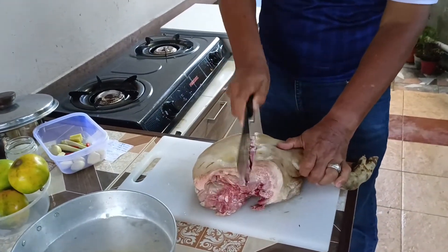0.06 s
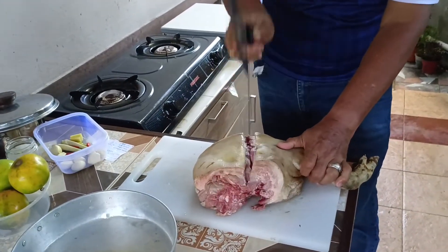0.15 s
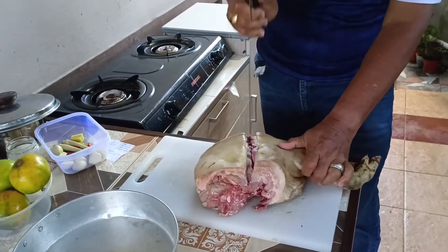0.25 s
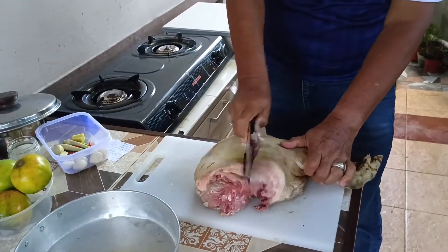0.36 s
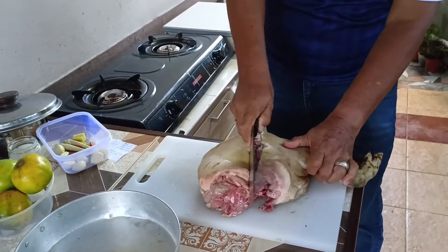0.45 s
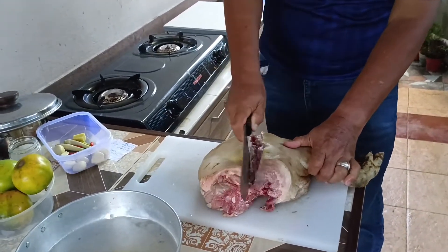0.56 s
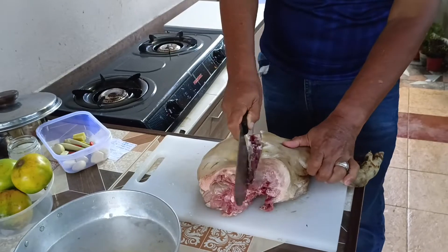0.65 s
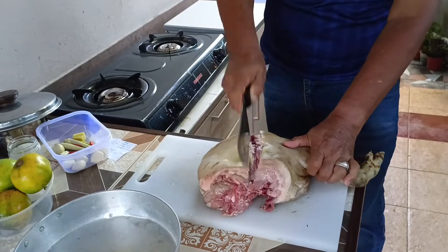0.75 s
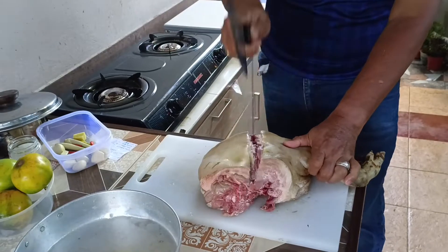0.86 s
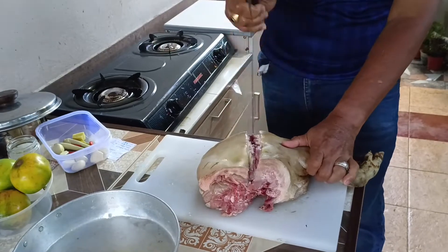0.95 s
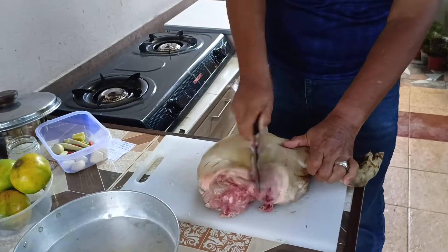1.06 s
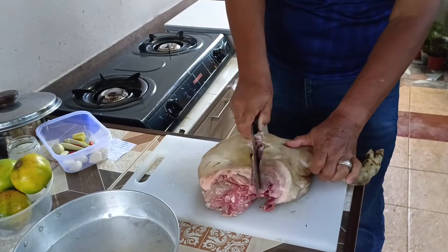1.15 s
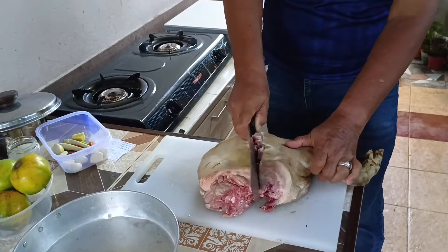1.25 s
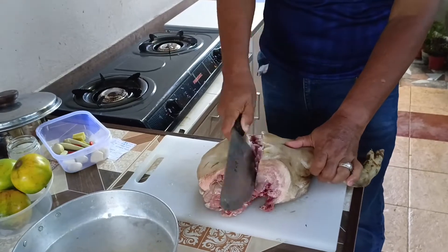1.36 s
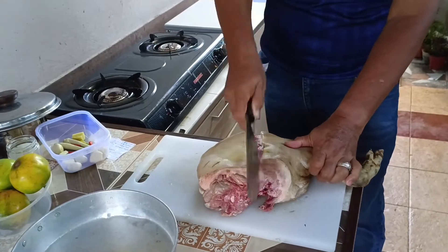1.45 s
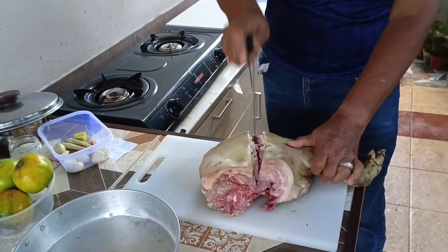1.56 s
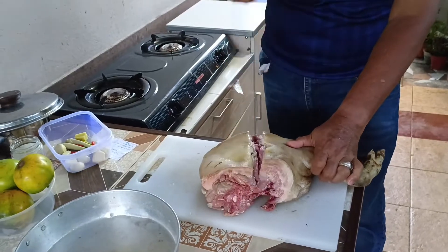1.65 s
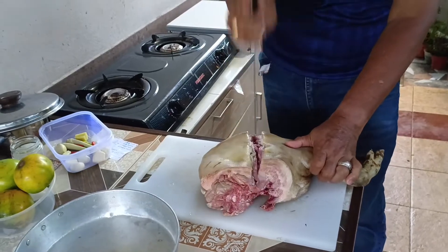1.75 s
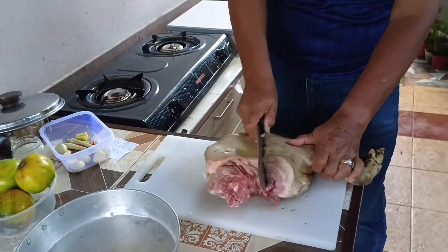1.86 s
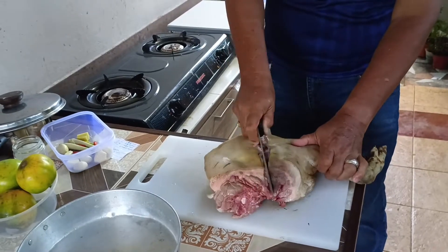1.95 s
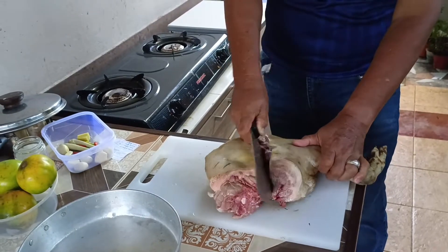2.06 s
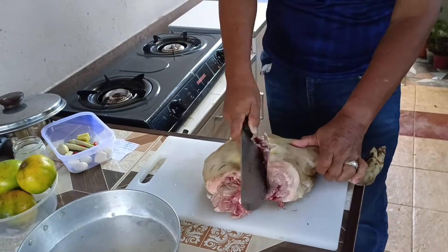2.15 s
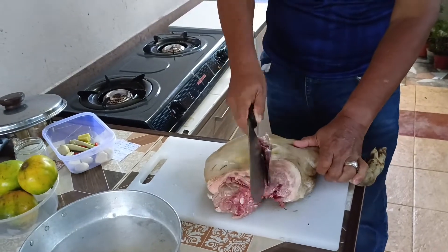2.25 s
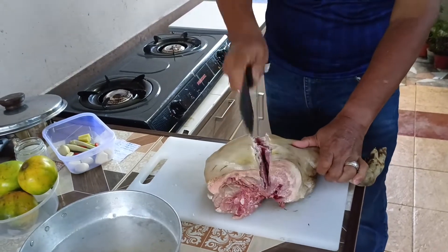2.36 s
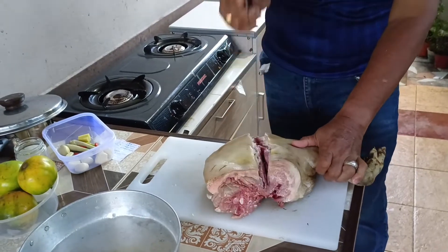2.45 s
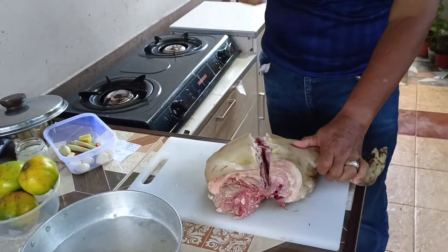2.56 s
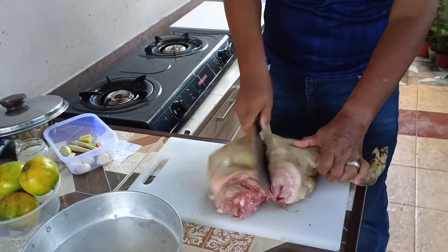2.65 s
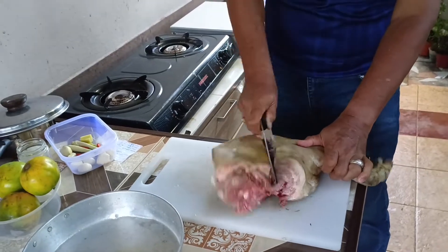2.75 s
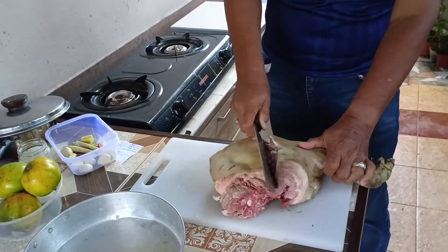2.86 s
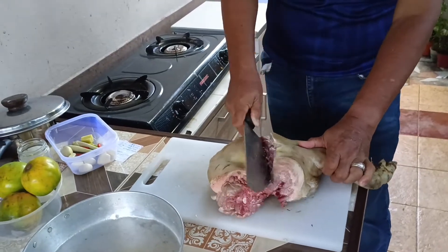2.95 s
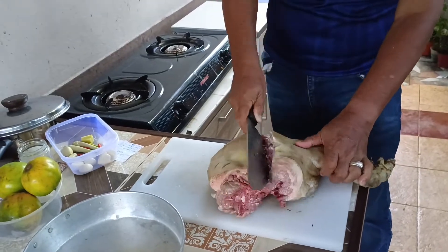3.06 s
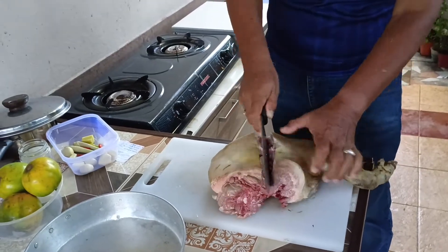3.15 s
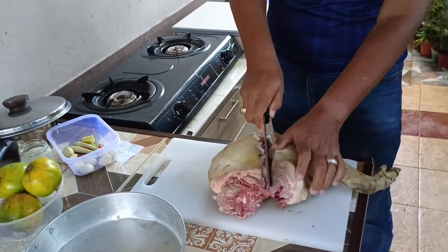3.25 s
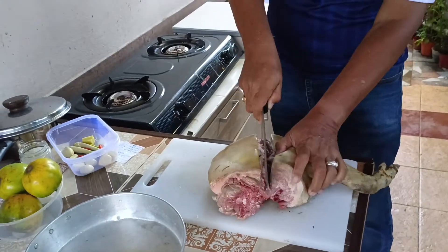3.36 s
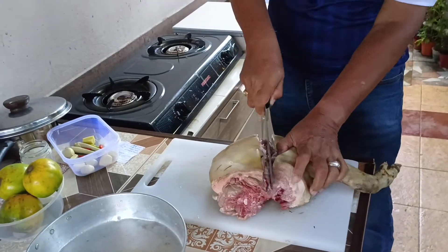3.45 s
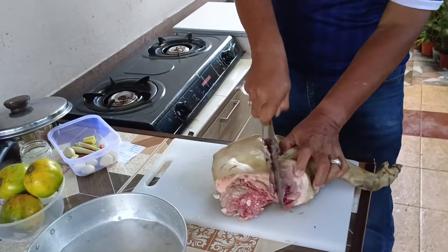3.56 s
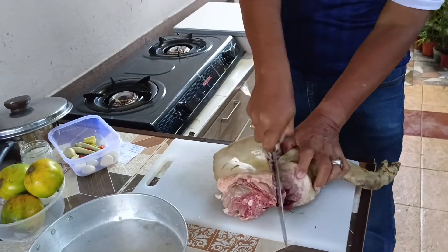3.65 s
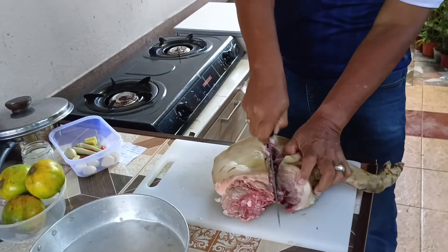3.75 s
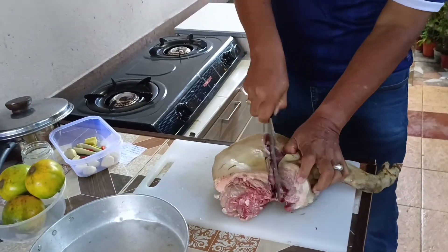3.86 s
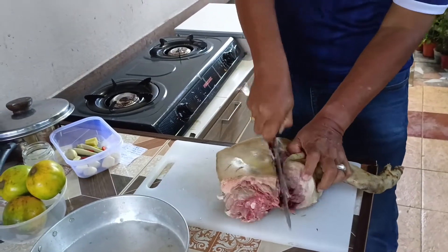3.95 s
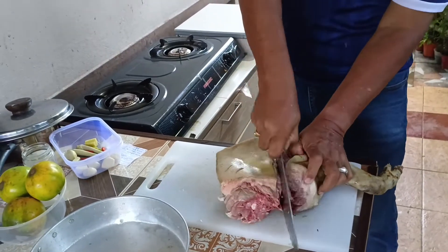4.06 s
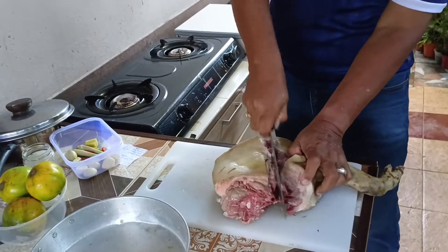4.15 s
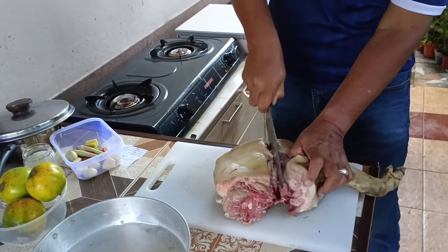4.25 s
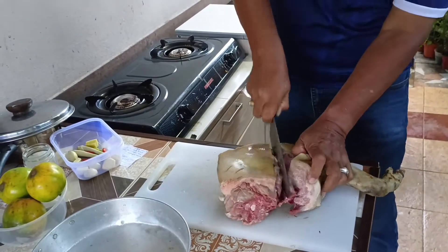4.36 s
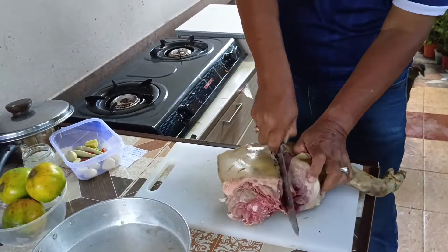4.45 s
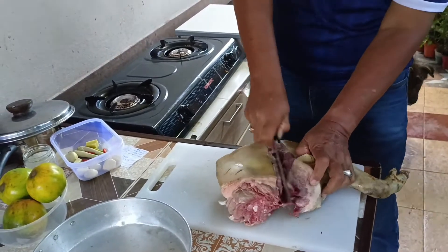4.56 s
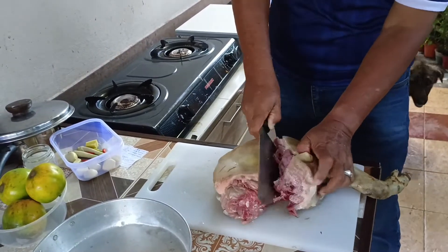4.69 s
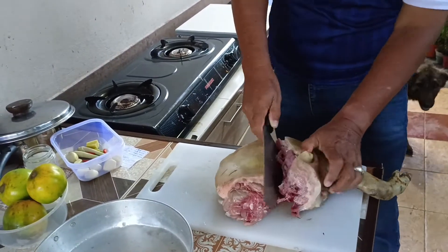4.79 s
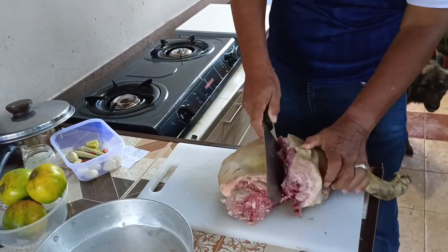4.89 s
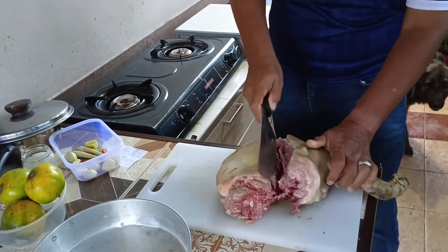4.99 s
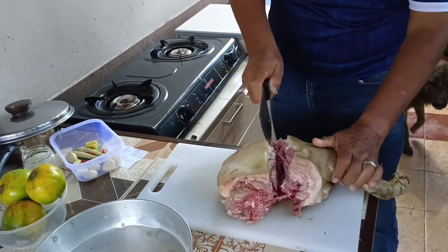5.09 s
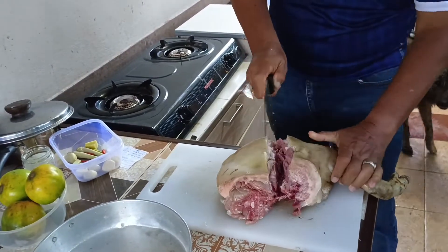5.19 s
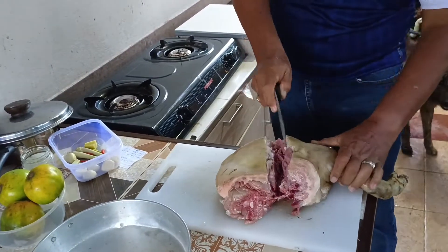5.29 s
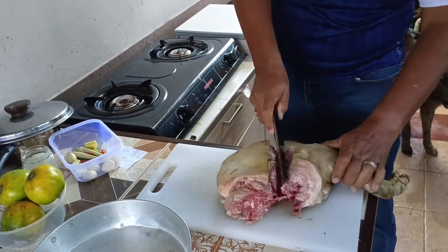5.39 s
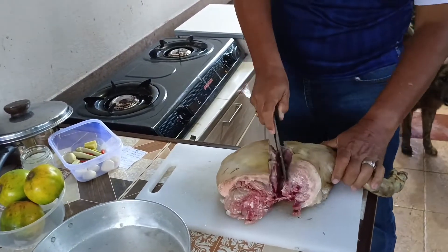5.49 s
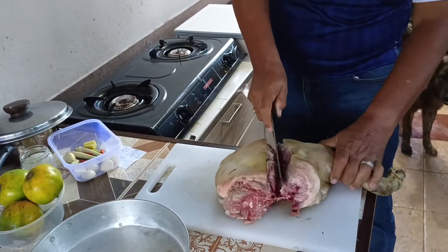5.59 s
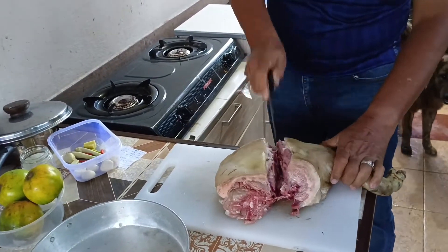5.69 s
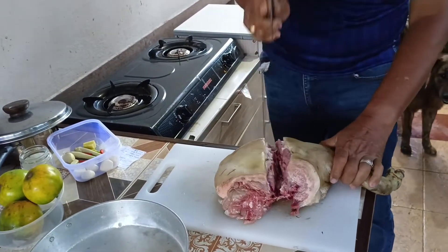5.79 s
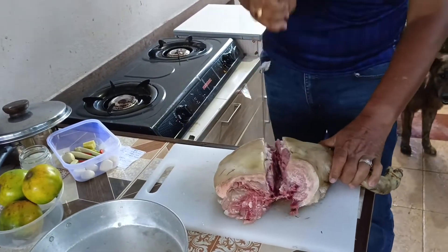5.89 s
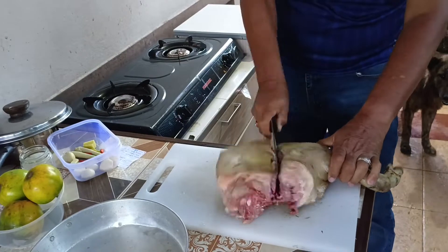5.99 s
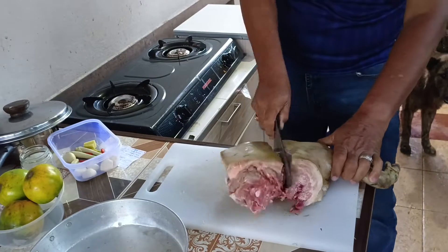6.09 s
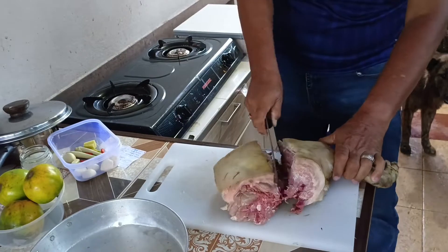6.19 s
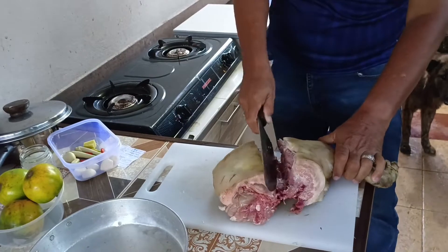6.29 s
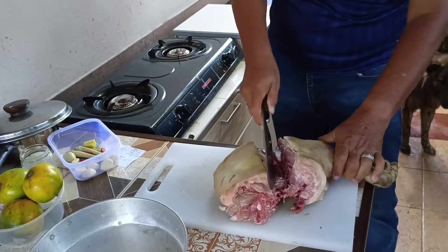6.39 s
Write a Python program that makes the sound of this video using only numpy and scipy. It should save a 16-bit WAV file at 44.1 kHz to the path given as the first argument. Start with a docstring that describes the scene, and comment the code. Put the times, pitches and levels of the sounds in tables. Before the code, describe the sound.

A close microphone in a roofed outdoor kitchen picks up quiet air, faint hiss and a low hum. At about 0.4 s a heavy knife chops a joint of meat on a plastic board: wet slap, short crack of bone, counter thud, brief metallic ring of the blade and faint pans. Similar chops follow near 1.15, 1.9 and 2.75 s, the later cracks sharper, with hollow double knocks and light taps of the board between, and sticky smacks. From 3.45 to 4.9 s the blade saws in short rasping wet strokes; gristle snaps near 3.7 and 4.05, with a hard pop at 4.4, and a dull slump at 4.13. Knocks cluster around 4.8 s and continue sparsely to 5.7, with a tiny squeak near 5.0. At 6.1 s comes the final, hardest chop, splitting loudly, its ring dying away. The level ducks at each blow and quickly recovers.

```python
"""A bone-cracking chop, then three more and a late fifth: a heavy knife hacks a joint of meat on a plastic board.
The place is a roofed outdoor kitchen. Each chop is a wet slap, a pitched crack of bone and a counter thud,
made of shaped noise bursts; blade and pans ring on as decaying modes, and the recorder's gain ducks and recovers.
Between chops the joint knocks the board (damped modes), the blade saws (grains through resonances) and gristle
snaps (resonant noise bursts), with squeaks, background noise and a low hum behind."""
import sys
import numpy as np
from scipy import signal
from scipy.fft import rfft, irfft, next_fast_len
from scipy.io import wavfile
from scipy.ndimage import uniform_filter1d

SR = 44100
rng = np.random.default_rng(int(sys.argv[2]) if len(sys.argv) > 2 else 0)


def store_pcm(level_fs):
    """Save levels as 16-bit WAV."""
    pcm = np.round(np.clip(level_fs, -1, 1) * 32767).astype(np.int16)
    wavfile.write(sys.argv[1], SR, np.atleast_2d(pcm).T)


N = 283563
T = np.arange(N) / SR   # seconds

# Wet flesh under the edge. Each row: frequency in Hz, relative level in dB per Hz.
SLAP_SPECTRUM = [(100, 4), (600, -1.5), (1800, 9), (3800, -6.5), (5000, -19.5), (6400, 1.5), (8000, -27.5),
                 (11000, -19), (13500, -16.5), (15500, -14)]
# Weight of a blow, also rushing air and contact on the board. Each row: frequency in Hz, relative dB per Hz.
BODY_SPECTRUM = [(180, -11.5), (270, -4.5), (400, 2.5), (520, -1), (650, 2), (1000, -1.5), (1300, -3),
                 (1600, -0.5), (1950, -8), (2300, -13), (3000, -17.5)]
SLAP_LEAD_S = 0.0035   # flesh is met before bone


def flesh_slap(out, s, slap_db):
    """Air swells ahead of the blade; the edge grazes the skin, then slaps into soft tissue as short noise bursts."""
    size = SR // 20
    swell = noise(BODY_SPECTRUM, size) * np.linspace(0, 1, size) ** 2
    add(out, s - size / SR, from_db(-68.0) * swell)
    graze = burst(noise(SLAP_SPECTRUM, size), length=0.0092)
    add(out, s - 2 * SLAP_LEAD_S, from_db(slap_db - 11.5) * graze)
    slap = burst(noise(SLAP_SPECTRUM, size), length=0.0032)
    add(out, s - SLAP_LEAD_S, from_db(slap_db) * slap)


# Splintering bone. Each row: frequency in Hz, relative level in dB per Hz.
CRACK_SPECTRUM = [(100, -8.5), (700, -22), (1300, 13), (2000, 5.5), (2500, -3), (3400, 6.5), (4800, -29),
                  (6400, -8.5), (8000, -25.5), (11000, -17.5), (13500, -23.5), (15500, -16)]


def bone_crack(out, s, crack_db, crack_hz, splinter_db):
    """Bone gives with a short pitched bark and a spray of splinters, then breaks again as the edge goes through."""
    size = SR // 20
    tone = np.sin(2 * np.pi * crack_hz * T[:size])
    bark = tone + from_db(splinter_db) * noise(CRACK_SPECTRUM, size)
    add(out, s, from_db(crack_db) * burst(bark, length=0.0028))
    # the second break has no pitched tone
    second = burst(noise(CRACK_SPECTRUM, size), length=0.0015)
    add(out, s + 0.0028, from_db(crack_db + splinter_db + 2.5) * second)


# Low thud of the counter. Each row: frequency in Hz, relative level in dB per Hz.
THUD_SPECTRUM = [(30, -53), (55, -28.5), (90, 0.5), (125, -4), (160, -3), (220, -4.5), (320, -16.5)]
# Bright scatter of a blow. Each row: frequency in Hz, relative level in dB per Hz.
TREBLE_SPECTRUM = [(1600, 7.5), (2200, -0.5), (2700, -9.5), (3500, 4.5), (4100, -6.5), (4900, -12),
                   (5600, -12), (6400, -5.5), (7800, -28.5), (10000, -19.5), (12000, -18), (13500, -18.5),
                   (15300, -18)]
TREBLE_DB, TREBLE_FOLLOWS = -13.5, 0.48   # treble of a 0 dB blow; dB per dB of weight


def counter_shake(out, s, weight_db, thud_db, t60):
    """The blow shakes the counter, heard as decaying bands of noise from thud to treble."""
    t = T[:SR]
    size = len(t)
    thud = noise(THUD_SPECTRUM, size) * fade(t, rise=0.0014, t60=0.24)
    add(out, s, from_db(thud_db) * thud)
    body = noise(BODY_SPECTRUM, size) * fade(t, rise=0.005, t60=t60)
    add(out, s, from_db(weight_db) * body)
    # the treble follows the weight and flutters at random in level
    flutter_db = 1.1 * drift(140, size)
    treble_gain = from_db(TREBLE_DB + TREBLE_FOLLOWS * weight_db + flutter_db)
    treble = noise(TREBLE_SPECTRUM, size) * fade(t, rise=0.00072, t60=1.05 * t60)
    add(out, s, treble_gain * treble)


# Modes of blade and counter. Each row: frequency in Hz, level in dB re the chop's ring before a random change,
# 60 dB decay time in seconds before the cap below.
METAL_MODES = [(97,-12.5,0.19), (136,-11,0.2), (360,-12,0.13), (398,-5,0.25), (443.5,-15,0.16),
               (490,-3,0.27), (597,-5.5,0.23), (690,-15,0.28), (728,-6,0.34), (820,-8,0.27), (928,-1.5,0.2),
               (998,-15.5,0.18), (1154,-8,0.094), (1455,-1.5,0.18), (1710,-4,0.35), (1810,3,0.26),
               (1933,1.5,.28), (2070,-14,0.4), (2155,-12,0.43), (2770,-14.5,0.47), (3230,-17.5,0.37),
               (3480,-21.5,0.45), (4020,-17,0.56), (4080,-21,0.41), (6270,-23.5,0.23)]
LONGEST_RING_S = 0.31
CLANG_DB = 2   # blade clang re metal ring


def metal_ring(out, s, ring_db, clang_hz):
    """The blade's crowded bending modes bloom after the blow as a noise band, with single modes ringing through."""
    t = T[:SR]
    clang = resonant_noise(clang_hz, 260, len(t)) * fade(t, rise=0.025, t60=0.27)
    add(out, s, from_db(ring_db + CLANG_DB) * clang)
    t = t[:SR // 2]
    for hz, db, t60 in METAL_MODES:
        # every blow shares its energy among the modes a little differently
        gain = from_db(ring_db + db + rng.normal(0, 2.3))
        decay = fade(t, rise=0.012, t60=min(t60, LONGEST_RING_S))
        add(out, s, gain * wavering(hz, t) * decay)


# Thin pans on the counter. Each row: frequency in Hz, mean level in dB re the chop's ring.
PAN_MODES = [(2126, -41), (2659, -46), (3090, -44), (3413, -42), (3580, -46)]


def pans(t):
    """Each blow reaches the pans' modes with random strengths, so their long, faint ring differs every time."""
    ring = sum(from_db(db + rng.normal(0, 3)) * wavering(hz, t) for hz, db in PAN_MODES)
    return ring * fade(t, rise=0.01, t60=1.1)


# Each row: bone contact in seconds, crack in dB, crack pitch in Hz, splinters in dB re crack, flesh slap in dB,
# weight of the blow in dB, counter thud in dB, metal ring in dB, blade clang pitch in Hz,
# 60 dB decay time of the weight in seconds.
CHOPS = [(0.4380, -16.5, 1710, -4.5, -30, -7.5, -19, -18.5, 2130, 0.24),
         (1.1542, -7, 1384, 0.5, -41.5, -6, -16, -16, 1816, 0.24),
         (1.9045, -2.5, 1613, 2, -32, -10.5, -25.5, -19, 1857, 0.24),
         (2.7520, -8, 1380, 1, -32, -13.5, -26.5, -18.5, 1824, 0.24),
         (6.0772, 2, 1490, -8.5, -17, -1.5, -22, -17.5, 1797, .22)]


def chops():
    """The edge slaps into flesh and cracks the bone, and the blow spreads through counter, blade and pans."""
    out = np.zeros(N)
    for s, crack_db, crack_hz, splinter_db, slap_db, weight_db, thud_db, ring_db, clang_hz, t60 in CHOPS:
        flesh_slap(out, s, slap_db)
        bone_crack(out, s, crack_db, crack_hz, splinter_db)
        counter_shake(out, s, weight_db, thud_db, t60)
        metal_ring(out, s, ring_db, clang_hz)
        add(out, s, from_db(ring_db) * pans(T[:SR]))
    return out


# The joint rocks and knocks the board on the counter. Each row: start in seconds, level in dB, mean pitch in Hz,
# lag of the second contact in seconds, level of the second contact in dB re the first.
KNOCKS = [(0.846, -25, 833, .015, -8), (1.611, -33.5, 912, 0.0078, 1), (2.328, -29.5, 808, 0.012, -2.5),
          (2.624, -38, 825, .012, -14), (3.137, -27, 820, 0.016, -2.5), (3.817, -38.5, 830, 0.011, -9),
          (4.003, -30, 848, .015, 0.5), (4.332, -39, 763, 0.016, 2.5), (4.651, -34.5, 913, .012, -13),
          (4.794, -34, 893, .011, 2), (4.833, -30, 830, 0.0099, -3.5), (4.905, -34, 816, 0.011, -10),
          (5.146, -25.5, 798, 0.0097, -4.5), (5.425, -29.5, 792, 0.013, -16), (5.733, -37, 778, 0.015, -17)]
# Lighter single taps of the board. Each row: start in seconds, level in dB.
TAPS = [(0.923, -37.5), (2.871, -26.5), (3.102, -38)]
# The board under the joint. Each row: multiple of the knock's pitch, level in dB, 60 dB decay in cycles of the mode.
BOARD_MODES = [(.58, -11, 23), (1.001, 4, 30.4), (1.17, -43, 34)]
TAP_HZ = 867   # mean pitch
CONTACT_DB, PORCH_DB = -15, -16   # contact noise and porch echo re the knock's level


def knocks():
    """Cushioned blows ring the damped board for a few cycles, in pairs or as taps; the porch answers faintly."""
    out, t = np.zeros(N), T[:SR // 3]
    size = len(t)
    first = [(s, db, hz) for s, db, hz, lag, second_db in KNOCKS]
    second = [(s + lag, db + second_db, hz) for s, db, hz, lag, second_db in KNOCKS]
    taps = [(s, db, TAP_HZ) for s, db in TAPS]
    for s, db, pitch in first + second + taps:
        hz = pitch * (1 + 0.041 * rng.standard_normal())   # the load on the board shifts
        board = np.zeros(size)
        for ratio, mode_db, cycles in BOARD_MODES:
            mode_hz = hz * ratio
            decay = fade(t, rise=0.004, t60=cycles / mode_hz)
            board += from_db(mode_db) * np.sin(2 * np.pi * mode_hz * t) * decay
        contact = rms_one(resonate(noise(BODY_SPECTRUM, size), 1.56 * hz, 750))
        contact = burst(contact, length=0.008)
        porch = resonant_noise(0.93 * hz, 0.96 * hz, size) * fade(t, rise=0.0037, t60=0.18)
        # soft flesh presses on the board just before the knock
        press = burst(noise(BODY_SPECTRUM, size), length=0.03)
        add(out, s - 0.012, from_db(db - 25.5) * press)
        knock = board + from_db(CONTACT_DB) * contact + from_db(PORCH_DB) * porch
        add(out, s, from_db(db) * knock)
    return out


THUMP_S, THUMP_DB, THUMP_HZ, THUMP_WIDTH_HZ, THUMP_T60_S = 4.13, -36, 265, 300, 0.13


def thump():
    """The loosened joint slumps on the board: a broad low resonance of noise that dies quickly."""
    out, t = np.zeros(N), T[:SR // 3]
    dull = resonant_noise(THUMP_HZ, THUMP_WIDTH_HZ, len(t))
    add(out, THUMP_S, from_db(THUMP_DB) * dull * fade(t, rise=0.0012, t60=THUMP_T60_S))
    return out


STROKE_ATTACK_DB_PER_S, STROKE_RELEASE_DB_PER_S = 487, 386


def stroke_db(start, length, level_db, rise_db):
    """The blade bites, is pushed on with growing or easing force, and slows to rest; effort in dB."""
    push = level_db + rise_db * (np.clip((T - start) / length, 0, 1) - 0.5)
    attack = STROKE_ATTACK_DB_PER_S * np.maximum(start - T, 0)
    release = STROKE_RELEASE_DB_PER_S * np.maximum(T - start - length, 0)
    return push - attack - release


# Strokes through the cut. Each row: start in seconds, length in seconds, mid-stroke level in dB,
# rise from start to end in dB.
STROKES = [(3.459, 0.022, -54.5, -3.5), (3.616, .105, -48, 1.5), (3.841, 0.065, -50, 10.5),
           (4.038, 0.043, -42, 1), (4.221, 0.13, -48.5, 9.5), (4.437, 0.098, -46, 1),
           (4.664, 0.057, -49, -5), (4.833, 0.1, -65.5, 0)]
# Tearing fibres. Each row: frequency in Hz, relative level in dB per Hz.
RASP_SPECTRUM = [(300,-7), (450,-12), (800,-13), (1250,-5.5), (1850,4.5), (2300,-4), (2800,-3), (3600,1.5),
                 (4300,-6), (5000,-23.5), (6500,-5)]
# Wet flesh along the blade. Each row: frequency in Hz, relative level in dB per Hz.
FIZZ_SPECTRUM = [(2650, -26), (4500, -14), (5300, -4), (6490, 0), (8110, -18), (10000, -3), (13600, -12),
                 (15000, -2), (16000, -13)]
FIZZ_DB, FIZZ_FOLLOWS = -32, 0.69   # fizz under a 0 dB stroke; dB per dB of effort


def sawing():
    """Fibres tear one by one, tiny clicks exciting the blade's resonances; wet flesh fizzes along it."""
    effort_db = np.max([stroke_db(*stroke) for stroke in STROKES], axis=0)
    blade = np.zeros(N)
    for hz in np.geomspace(450, 5000, 16):
        tears = resonate(grains(per_s=450, spread_db=2.8), hz, hz / 11)
        # the flesh damps now one, now another resonance of the blade
        blade += tears / np.sqrt(hz) * from_db(3.5 * drift(28, N))
    rasp = from_db(effort_db) * coloured(blade, RASP_SPECTRUM)
    wet = coloured(grains(per_s=1800, spread_db=3.8), FIZZ_SPECTRUM)
    fizz = from_db(FIZZ_DB + FIZZ_FOLLOWS * effort_db) * wet
    stick_slip = from_db(1.9 * drift(110, N))
    return (rasp + fizz) * stick_slip


# Gristle snaps under the blade. Each row: start in seconds, level in dB, pitch in Hz.
SNAPS = [(1.645, -37.5, 3200), (3.702, -27, 1760), (3.7238, -28.5, 3400), (4.041, -22, 1900),
         (4.402, -11.5, 2670), (4.4444, -20, 1860), (4.4546, -24, 2700), (4.4807, -25, 1920)]
# Wet flesh smacks as it comes unstuck. Each row: start in seconds, level in dB, pitch in Hz.
SMACKS = [(0.0443, -34, 3900), (2.3185, -28.5, 4020), (2.6188, -33.5, 3780), (3.1394, -23.5, 1580),
          (3.3845, -37, 3560), (4.727, -46, 6850), (4.8627, -41, 6300), (4.8852, -39.5, 3560),
          (5.4903, -36, 6400), (5.935, -34, 2960)]
# Wet spray of both. Each row: frequency in Hz, relative level in dB per Hz.
SPRAY_SPECTRUM = [(900, 9), (1600, -6.5), (3900, 0), (5000, -8.5), (6400, -4.5), (8200, -28), (11000, -13),
                  (15500, -14)]
SNAP_SPRAY_DB, SMACK_SPRAY_DB = -15.5, 1.5   # broad spray re the pitched core
SNAP_WIDTH_HZ, SNAP_WIDTH_DOUBLES_DB = 2440, 14   # width of a 0 dB snap; harder snaps are broader
SNAP_BURST_DB, SNAP_TAIL_DB = -14, -26   # burst and porch tail re the event's level


def snaps(events, spray_db):
    """Tissue parts with a short pitched burst of resonant noise, a wet spray and a faint tail."""
    out, t = np.zeros(N), T[:SR // 4]
    for s, db, hz in events:
        width_hz = SNAP_WIDTH_HZ * 2 ** (db / SNAP_WIDTH_DOUBLES_DB)
        core = resonant_noise(hz, width_hz, len(t))
        tone = rms_one(core + from_db(spray_db) * noise(SPRAY_SPECTRUM, len(t)))
        snap = from_db(SNAP_BURST_DB) * burst(tone, length=0.0045)
        tail = from_db(SNAP_TAIL_DB) * tone * fade(t, rise=0.0021, t60=0.17)
        add(out, s, from_db(db) * (snap + tail))
    return out


# Faint high squeaks. Each row: start in seconds, level in dB, mean pitch in Hz.
SQUEAKS = [(0.176, -63.5, 3550), (5.016, -56.5, 1680), (5.809, -64.5, 3270), (5.992, -62, 3700)]
SQUEAK_S, SQUEAK_WAVER = 0.031, 0.042   # length in seconds; waver as a share of the pitch


def squeaks():
    """Brief whistles: sine bursts whose pitch wavers slightly at random."""
    out, size = np.zeros(N), SR // 6
    for s, db, hz in SQUEAKS:
        pitch = hz * (1 + SQUEAK_WAVER * drift(400, size))
        whistle = np.sin(2 * np.pi * np.cumsum(pitch) / SR)
        add(out, s, from_db(db) * burst(whistle, SQUEAK_S))
    return out


# Background level over time, as the recorder lets it through. Each row: time in seconds, base level in dB.
BACKGROUND_LEVEL = [(0.0, -62.5), (1.16, -61.5), (2.61, -63.5), (2.81, -61.5), (3.42, -61.5), (3.96, -59),
                    (5.84, -59.5), (6.12, -58), (6.43, -63)]
# Low air. Each row: frequency in Hz, relative level in dB per Hz.
AIR_SPECTRUM = [(25,-40.5), (50,-15.5), (80,-14), (105,-14), (125,2.5), (150,-10.5), (320,-10.5),
                (420,-12.5), (800,-12.5), (1100,-17), (1500,-17.5), (2000,-20), (2600,-35.5)]
# High hiss, also the sticky ticks. Each row: frequency in Hz, relative level in dB per Hz.
HISS_SPECTRUM = [(2300,-7.5), (2700,-9), (3500,4.5), (4400,-7.5), (5200,-6.5), (6500,-4.5), (8500,-15.5),
                 (11500,-8.5), (13500,-15.5), (15000,-10.5), (16000,-1.5)]
AIR_DB, HISS_DB = 2.5, -8   # low air and high hiss re the base level
HUM_HZ, HUM_DB = 126.8, -68.5


def background():
    """Low air and hiss as noise, a hum wavering as a narrow noise band, and faint sticky ticks from handled meat."""
    s, base_db = np.transpose(BACKGROUND_LEVEL)
    low_air = from_db(AIR_DB) * noise(AIR_SPECTRUM, N)
    hiss = from_db(HISS_DB) * noise(HISS_SPECTRUM, N)
    air = from_db(np.interp(T, s, base_db)) * (low_air + hiss)
    hum = resonant_noise(HUM_HZ, 18, N)
    ticks = grains(per_s=12, spread_db=2.5)
    tick_sound = burst(noise(HISS_SPECTRUM, SR // 20), length=0.0027)
    sticky = rms_one(signal.fftconvolve(ticks, tick_sound)[:N])
    return air + from_db(HUM_DB) * hum + from_db(-80) * sticky


def from_db(db):
    """Amplitude factor of a level in dB."""
    return 10 ** (np.asarray(db) / 20)


def rms_one(x):
    """Scales a signal to rms 1."""
    return x / np.sqrt(np.mean(x ** 2) + 1e-20)


def add(out, s, sound):
    """Mixes a sound in from time s in seconds."""
    start = max(round(s * SR), 0)
    out[start:start + len(sound)] += sound[:N - start]


def coloured(x, spectrum):
    """Filters a signal by a spectrum that falls 24 dB per octave beyond its ends; rms 1."""
    hz, db = np.transpose(spectrum)
    size = next_fast_len(len(x))
    f = np.maximum(np.arange(size // 2 + 1) * SR / size, 1)
    octaves_outside = np.maximum(np.log2(hz[0] / f), 0) + np.maximum(np.log2(f / hz[-1]), 0)
    gain = from_db(np.interp(np.log(f), np.log(hz), db) - 24 * octaves_outside)
    return rms_one(irfft(rfft(x, size) * gain, size)[:len(x)])


def noise(spectrum, size):
    """Random noise with a given spectrum; rms 1."""
    return coloured(rng.standard_normal(size), spectrum)


def resonate(x, hz, width_hz):
    """One resonance with gain 1 on top."""
    r = np.exp(-np.pi * width_hz / SR)
    feedback = [1, -2 * r * np.cos(2 * np.pi * hz / SR), r * r]
    return signal.lfilter(np.array([1, 0, -1]) * (1 - r * r) / 2, feedback, x)


def resonant_noise(hz, width_hz, size):
    """Noise through the same resonance twice, for steeper sides; rms 1."""
    once = resonate(rng.standard_normal(size), hz, width_hz)
    return rms_one(resonate(once, hz, width_hz))


def fade(t, rise, t60):
    """A quick swell, then a steady fall in dB."""
    return (1 - np.exp(-t / rise)) * from_db(-60 * t / t60)


def burst(carrier, length):
    """A rounded burst lasting about length seconds, its energy scaled to rms 1 over that time."""
    t = T[:len(carrier)]
    shaped = carrier * (1 - np.exp(-8 * t / length)) * np.exp(-(t / length) ** 2)
    return shaped / np.sqrt(np.sum(shaped ** 2) / (length * SR))


def drift(rate, size):
    """A random line through about rate new values a second, each drawn with spread 1."""
    knots = rng.standard_normal(size // 20)
    return np.interp(T[:size] * rate, np.arange(len(knots)), knots)


def wavering(hz, t):
    """A mode whose reflections beat against it, so that its phase and strength wander."""
    phase = 2 * np.pi * (hz * t + rng.random()) + 0.5 * drift(30, len(t))
    return np.sin(phase) * from_db(3.5 * drift(30, len(t)))


def grains(per_s, spread_db):
    """Tiny clicks of uneven size and random sign at random moments."""
    size_db = spread_db * np.minimum(rng.exponential(1, N), 4)
    sizes = from_db(size_db) * rng.choice([-1, 1], N)
    return sizes * (rng.random(N) < per_s / SR)


def scene():
    """Chops, the rocking joint and the work in the cut, over the background."""
    cutting = sawing() + snaps(SNAPS, SNAP_SPRAY_DB) + snaps(SMACKS, SMACK_SPRAY_DB)
    return (chops() + knocks() + thump() + cutting + squeaks() + background())[None]


def gain_control(x, threshold_db, release_db_per_s, attack_s):
    """Loud sounds pull the gain down within milliseconds; it climbs back at a steady rate in dB."""
    power = np.maximum(uniform_filter1d(x[0] ** 2, size=128), 1e-12)
    over_db = np.maximum(10 * np.log10(power) - threshold_db, 0)
    # a running maximum on a tilted line holds each peak and lets it fall steadily
    held_db = np.maximum.accumulate(over_db + release_db_per_s * T) - release_db_per_s * T
    r = np.exp(-1 / (attack_s * SR))
    return x * from_db(-signal.lfilter([1 - r], [1, -r], held_db))


CUTOFF_HZ = 16000


def record(dry):
    """The recorder's gain ducks under loud sounds, deep bass is shed, peaks are rounded, the top is cut."""
    ducked = gain_control(dry, threshold_db=-14.5, release_db_per_s=181, attack_s=0.0026)
    lean = signal.sosfilt(signal.butter(4, 56, "high", fs=SR, output="sos"), ducked)
    ceiling = 0.8
    rounded = ceiling * np.tanh(lean / ceiling)
    return signal.sosfilt(signal.ellip(10, 0.1, 80, CUTOFF_HZ, fs=SR, output="sos"), rounded)


dry = scene()
out = record(dry)
store_pcm(out)
```